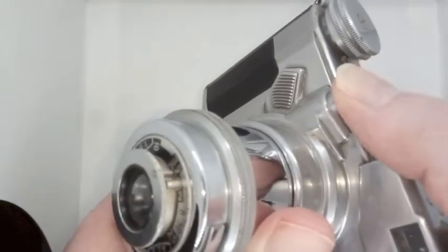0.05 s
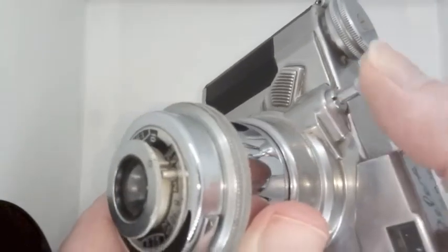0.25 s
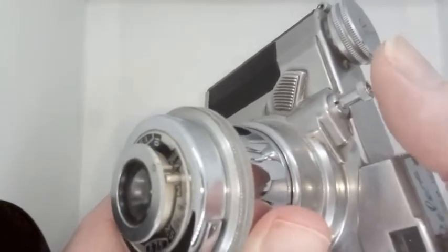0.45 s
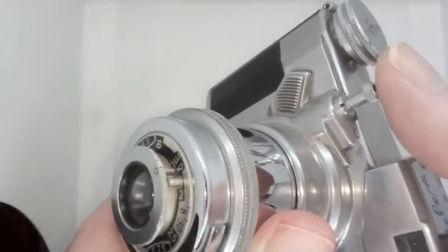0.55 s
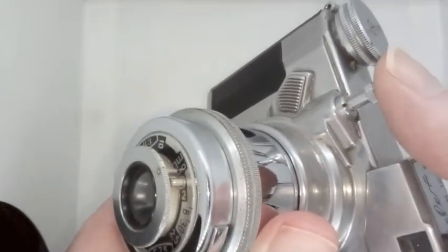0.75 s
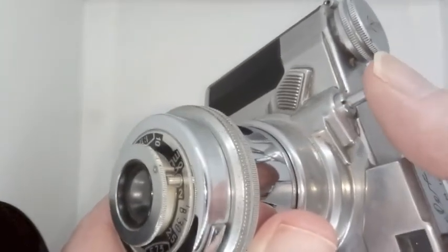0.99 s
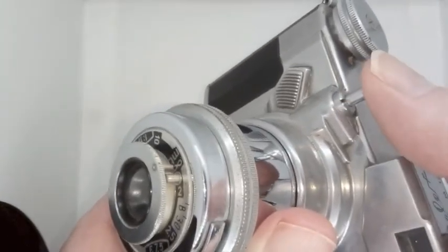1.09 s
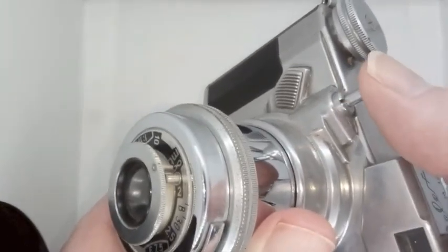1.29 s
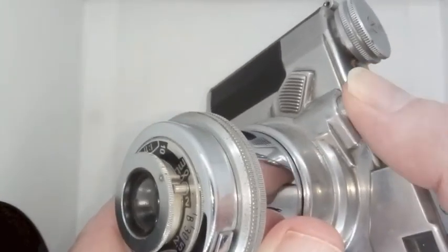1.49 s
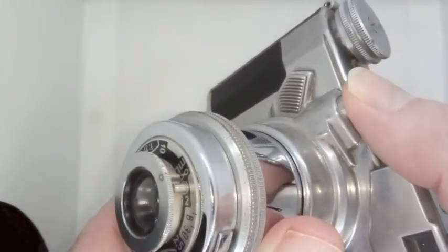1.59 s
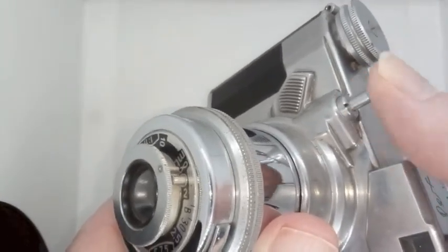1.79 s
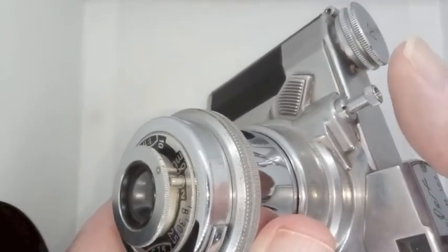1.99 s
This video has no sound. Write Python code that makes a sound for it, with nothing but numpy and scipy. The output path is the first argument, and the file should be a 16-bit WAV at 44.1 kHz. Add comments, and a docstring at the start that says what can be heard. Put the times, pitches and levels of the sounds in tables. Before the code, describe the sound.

Vintage camera shutter released twice by hand, sharp metallic double clicks in a quiet room

```python
"""A quiet room, a vintage metal camera close to a small microphone. A thumb trips the release, the leaf shutter
snaps open and shut; a finger slides, then cocks the lever (creak, two catches) and it is released again.
Clicks are body modes plus a noise crack, each answered by the room; an earlier cocking leaves its tail at the start.
Filtered noise makes air, handling rumble and rustle; sines make appliance hum and spring; slips make the creak."""
import sys
import numpy as np
from scipy import signal
from scipy.fft import rfft, irfft, next_fast_len
from scipy.io import wavfile
from scipy.ndimage import map_coordinates

SR = 44100
rng = np.random.default_rng(int(sys.argv[2]) if len(sys.argv) > 2 else 0)


def attenuation_scalar(level_db):
    """Turn a level in dB into a linear amplitude multiplier (20 dB per decade)."""
    decades = np.asarray(level_db, float) / 20
    return 10 ** decades


def dump(signal):
    """Clip the signal to [-1, 1] and save it as 16-bit WAV at the path in sys.argv[1]."""
    limited = np.clip(np.atleast_2d(signal).T, -1, 1)
    pcm = np.round(limited * 32767).astype(np.int16)
    wavfile.write(sys.argv[1], SR, pcm)


N = 90404
LEAD = SR // 4  # samples kept ahead of time 0
LOW_BELOW_HZ = 2000  # thud of clicks, groan of creak


def along(points, hz):
    """Interpolates (frequency [Hz], value) points on a log frequency axis."""
    f, v = np.transpose(points)
    return np.interp(np.log(hz + 1), np.log(f + 1), v)


def unit(x):
    """Scales to rms 1."""
    return x / np.sqrt(np.mean(x ** 2) + 1e-20)


def coloured(x, tone):
    """Filters x by a (frequency [Hz], gain [dB]) spectrum."""
    m = next_fast_len(len(x) + 8192)
    gain = attenuation_scalar(along(tone, np.fft.rfftfreq(m, 1 / SR)))
    return irfft(rfft(x, m) * gain, m)[:len(x)]


def wobble(knots_per_s):
    """Smooth random curve."""
    knots = rng.standard_normal(N // 1000 + 9)
    return map_coordinates(knots, [np.arange(N) * knots_per_s / SR])


# room tone and microphone hiss: (frequency [Hz], relative density [dB])
AIR_TONE = [(25, -18.5), (60, -8.5), (100, -5.5), (150, -4.5), (304, -9), (410, -12), (538, -18),
            (600, -9.5), (690, -18.5), (952, -22.5), (1430, -24.5), (3060, -28), (6000, -29.5),
            (7700, -41.5), (13900, -43), (14500, -33), (15600, -35), (15900, -65)]
# hands shifting on the camera: (time [s], relative level [dB])
RUMBLE = [(0, -65.5), (.2, -65), (.29, -75.5), (.36, -74), (.45, -71.5), (.62, -70), (.7, -71),
          (.84, -67.5), (.9, -71), (.96, -68), (1.05, -73.5), (1.17, -77), (1.24, -67), (1.33, -73),
          (1.46, -74.5), (1.63, -74.5), (1.72, -68), (1.86, -69.5), (1.94, -66), (2.0, -65.5), (2.05, -70)]


def air():
    """Steady coloured noise whose low end swells with handling."""
    air_db, swell_spread_db = -70, 4.5
    noise = unit(coloured(rng.standard_normal(N), AIR_TONE))
    low = coloured(noise, [(300, 0), (500, -60)])
    swell_db = np.interp(np.arange(N) / SR, *np.transpose(RUMBLE))
    swell = attenuation_scalar(swell_db - swell_db.mean() + swell_spread_db * wobble(2.7))
    return attenuation_scalar(air_db) * (noise + low * (swell - 1))


# appliance tones: (frequency [Hz], rms level [dB])
HUM = [(156.1, -80), (301.5, -83), (489.9, -77), (586.8, -76.5), (1421, -87.5), (1470, -96.5), (1642, -96),
       (4188, -103), (4457, -83.5)]


def hum():
    """Steady-level appliance tones with wavering phase."""
    t = np.arange(N) / SR
    out = 0
    for hz, rms_db in HUM:
        out = out + np.sqrt(2) * attenuation_scalar(rms_db) * np.sin(2 * np.pi * hz * t + 1.6 * wobble(6))
    return out


# diffuse decay: (frequency [Hz], t60 [s])
ROOM_T60 = [(500, .35), (1400, 0.33), (3000, 0.3), (6000, 0.34), (9000, 0.28), (15000, 0.23)]
# colour of the answer: (frequency [Hz], relative gain [dB])
ROOM_TONE = [(500, 9), (900, -3), (1400, 1.5), (3000, 2.5), (6000, -1), (9000, -0.5), (15000, -0.5),
             (15700, -5), (16000, -43)]


def room(x):
    """Quick answer of table and nearby surfaces, plus a diffuse one that builds up, then decays per frequency."""
    near_db, near_t60_s, build_up_s = -13.5, 0.09, 0.072
    hz, t, z = signal.stft(rng.standard_normal(SR // 2), SR, nperseg=128)
    far = attenuation_scalar(-60 * t / along(ROOM_T60, hz)[:, None]) * (1 - np.exp(-t / build_up_s))
    near = attenuation_scalar(near_db - 60 * t / near_t60_s)
    shape = attenuation_scalar(along(ROOM_TONE, hz)[:, None]) * (far + near)
    tail = signal.istft(z * shape, SR, nperseg=128)[1]
    return signal.fftconvolve(x, tail / np.linalg.norm(tail))


# modes of the metal body: (frequency [Hz], relative level [dB], ring length [multiple of click t60])
BODY = [(535, 1, 7), (924, -3.5, 1.8), (1235, -1, 2.5), (1450, -6.5, 1.5), (1642, 2, 1.5), (1856, -1, 1.3),
        (2600, 0, 1.1), (3275, -3, 1.1), (3905, 1.5, 1.1), (5650, -3, 1.1), (5881, 9.5, 1.2),
        (6474, -2, 1.3), (6820, -6, 1.2), (7840, -6, 1.2), (8430, 4.2, 1.05), (10000, 4.5, 1.1),
        (11150, -1, 1.1), (12000, 5, 1.1), (13700, 3.5, 1.1), (14650, 6, 1.2), (15400, -6, 1.1)]


def click(t60_ms, thud_db, rise_ms, tone, bounce):
    """One blow and its rebounds ring the body modes over a noise crack; energy proportional to t60."""
    crack_db, scatter_db = -1.5, -1
    crack_full_above_hz, crack_bass_db = 2400, -7
    t = np.arange(SR // 8) / SR
    hz, mode_db, ring = np.transpose(BODY)[:, :, None]
    weight = attenuation_scalar(along(tone, hz) + mode_db + thud_db * (hz < LOW_BELOW_HZ))
    weight = weight / np.linalg.norm(weight)
    thin = [(f, db + crack_bass_db * (f < crack_full_above_hz)) for f, db in tone]
    out = 0
    for ms, db in [(0.015, 0)] + bounce:
        u_ms = np.maximum(1000 * t - ms, 0)
        scatter = rng.standard_normal(hz.shape)
        phase = rng.uniform(0, 2 * np.pi, hz.shape)
        decay = attenuation_scalar(scatter_db * scatter - 60 * u_ms / (t60_ms * ring))
        modes = weight * decay * np.sin(2 * np.pi * hz * t + phase)
        crack = attenuation_scalar(crack_db - 60 * u_ms / t60_ms) * unit(coloured(rng.standard_normal(len(t)), thin))
        rise = np.sin(np.pi / 2 * np.minimum(u_ms / rise_ms, 1)) ** 2
        out = out + attenuation_scalar(db) * rise * (modes.sum(0) + crack)
    return out / np.linalg.norm(out) * np.sqrt(t60_ms * SR / 40000)


def clicks(rows, rise_ms, tone, bounce):
    """Places clicks of one kind, each with its own room answer."""
    out = np.zeros(N + LEAD + SR)
    for s, db, t60_ms, thud_db, send_db in rows:
        blow = attenuation_scalar(db) * click(t60_ms, thud_db, rise_ms, tone, bounce)
        wet = attenuation_scalar(send_db) * room(blow)
        at = round(s * SR) + LEAD
        out[at:at + len(blow)] += blow
        out[at:at + len(wet)] += wet
    return out[LEAD:LEAD + N]


# lever catches: (time [s], level [dB], t60 [ms], low thud [dB], room send [dB])
COCKS = [(1.3567, -17.5, 21, .1, -8), (1.3837, -13, 13.2, -4, -9)]
# cocking before the start, same columns
EARLIER_COCK = [(-.15, -15, 20, .1, -9.5)]
# colour: (frequency [Hz], relative level [dB])
COCK_TONE = [(300, -54), (540, -28.5), (800, -30.5), (1200, -19.5), (1700, -17.5), (2600, -19),
             (3860, -14.5), (4900, -17.5), (5800, -13.5), (6800, 2), (7700, -6), (8700, -5), (9400, -11.5),
             (10300, -6), (13700, -16), (14900, -3.5), (16800, -27)]
# rebounds: (delay [ms], level [dB])
COCK_BOUNCE = [(1.7, -8.5), (4.2, -7.5), (11, -22)]


def cocking():
    """Lever catches strike the body and rebound."""
    return clicks(COCKS + EARLIER_COCK, 1, COCK_TONE, COCK_BOUNCE)


# release button catch: (time [s], level [dB], t60 [ms], low thud [dB], room send [dB])
TRIPS = [(.1638, -31.5, 16, 1.7, -9), (1.6866, -27, 15.2, -1.4, -8.5)]
# colour: (frequency [Hz], relative level [dB])
TRIP_TONE = [(500, -55), (1100, -37), (1450, -18.5), (1700, -1), (2000, -21.5), (2800, -27.5), (4200, -16),
             (5000, -23), (5700, -4.5), (6700, -1), (7600, -13.5), (9500, -17), (13500, -17), (15000, -5),
             (16800, -27)]
# rebounds: (delay [ms], level [dB])
TRIP_BOUNCE = [(1.799, -5.5)]


def release():
    """Button catch trips, with one rebound."""
    return clicks(TRIPS, 0.97, TRIP_TONE, TRIP_BOUNCE)


# blades fly open: (time [s], level [dB], t60 [ms], low thud [dB], room send [dB])
OPENS = [(.2233, -23.5, 22, 0.09, -11.5), (1.7367, -21.5, 16, 0.67, -11.5)]
# colour: (frequency [Hz], relative level [dB])
OPEN_TONE = [(350, -47.5), (600, -25), (1510, -4), (3480, -2), (4660, -12.5), (5740, -1), (7700, -14.5),
             (11100, -6), (13300, -18.5), (15000, 1.5), (16800, -20.5)]
# rebounds: (delay [ms], level [dB])
OPEN_BOUNCE = [(2.2, -8.5), (4.2, -2.5)]


def blades_open():
    """Opening blades strike the body and rebound."""
    return clicks(OPENS, 1.1, OPEN_TONE, OPEN_BOUNCE)


# light ticks before the slams: (time [s], level [dB], t60 [ms], low thud [dB], room send [dB])
TICKS = [(.2385, -41, 8, .1, -8.5), (.2403, -25.5, 5.9, .1, -8.5), (1.7523, -46, 11, .1, 14)]
# colour of ticks and slams: (frequency [Hz], relative level [dB])
SHUT_TONE = [(300, -45), (540, -32), (720, -28), (900, -16), (1300, -25.5), (1700, -19), (2600, -19),
             (4000, -14.5), (5000, -19.5), (5450, -2.5), (6100, -4), (6900, -3.5), (7800, -17),
             (8600, -9.5), (9300, -18), (10500, -8.5), (12700, -12), (14000, -16), (14800, 1.5),
             (15600, -18.5), (16800, -27)]


def ticks():
    """Brief body rings without rebounds."""
    return clicks(TICKS, 0.6, SHUT_TONE, [])


# blades slam shut: (time [s], level [dB], t60 [ms], low thud [dB], room send [dB])
SHUTS = [(.2421, -4, 9.65, .1, -12), (1.756, -11.5, 16, 2.3, -7)]
# rebounds: (delay [ms], level [dB])
SHUT_BOUNCE = [(2.4, -19.5), (5, -13.5), (11, -20.5)]


def blades_shut():
    """Closing blades slam and rebound."""
    return clicks(SHUTS, 1.4, SHUT_TONE, SHUT_BOUNCE)


# slow ring: (frequency [Hz], level before decay [dB], t60 [s])
SPRING = [(593.3, -60, .8), (1343, -67, 1)]


def spring():
    """A spring inside swells and rings on faintly after each slam and the last cocking catch."""
    swell_s = 0.06
    out = 0
    for s in [row[0] for row in SHUTS + COCKS[-1:]]:
        u = np.maximum(np.arange(N) / SR - s, 0)
        for hz, db, t60_s in SPRING:
            level = attenuation_scalar(db - 60 * u / t60_s + 2.3 * wobble(15)) * (1 - np.exp(-u / swell_s))
            out = out + level * np.sin(2 * np.pi * hz * u)
    return out


# sliding finger: (frequency [Hz], relative level [dB])
RUSTLE_TONE = [(500, -31), (1000, -8), (1700, 2), (5000, -8), (8000, -38)]


def rustle():
    """A finger slides: coloured noise under a bell-shaped envelope."""
    centre_s, level_db, length_s = 1.065, -77, 0.035
    envelope = np.exp(-((np.arange(N) / SR - centre_s) / length_s) ** 2)
    return attenuation_scalar(level_db) * envelope * unit(coloured(rng.standard_normal(N), RUSTLE_TONE))


# lever spring being wound: (time [s], level [dB], low groan against the rest [dB])
CREAK = [(1.3194, -77, -11), (1.3205, -52.5, -32), (1.325, -58, -4), (1.331, -64.5, 8.5), (1.339, -61, 9),
         (1.344, -50.5, 6), (1.347, -52.5, -1.5), (1.3548, -49, -2)]
# resonances: (frequency [Hz], width [Hz], relative level [dB])
CREAK_RINGS = [(1680, 130, -3), (4100, 300, -15.5), (5860, 350, -3.5), (6620, 400, -7), (8700, 350, -9.5),
               (9500, 700, -15), (12700, 600, -29), (14900, 1200, -13)]


def creak():
    """Small random slips of the spring ring a few resonances."""
    slips_per_s = 500
    time_s, level_db, groan_db = np.transpose(CREAK)
    now_s = np.arange(N) / SR
    groan_db = np.interp(now_s, time_s, groan_db)
    t = np.arange(SR // 40) / SR
    out = 0
    for hz, width_hz, ring_db in CREAK_RINGS:
        slips = rng.choice([-1, 1], N) * (rng.uniform(size=N) < slips_per_s / SR)
        ring = t * np.exp(-np.pi * width_hz * t) * np.sin(2 * np.pi * hz * t)
        gain = attenuation_scalar(ring_db + groan_db * (hz < LOW_BELOW_HZ))
        out = out + gain * unit(signal.fftconvolve(slips, ring)[:N])
    return attenuation_scalar(np.interp(now_s, time_s, level_db, -120, -120)) * out


def scene():
    """Camera in the room, one channel."""
    camera = release() + blades_open() + blades_shut() + cocking() + ticks()
    return (camera + creak() + spring() + air() + rustle() + hum())[None]


def band_limit(x):
    """A steep low-pass at the top of the band."""
    return signal.sosfilt(signal.butter(12, 16970, fs=SR, output="sos"), x)


def record(dry):
    """Returns the finished mix as recorded."""
    return band_limit(dry)


dry = scene()
out = record(dry)
dump(out)
```